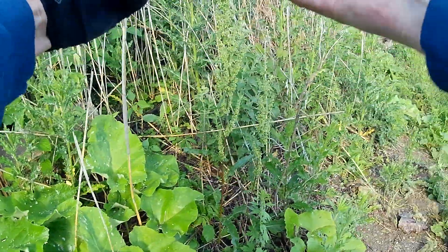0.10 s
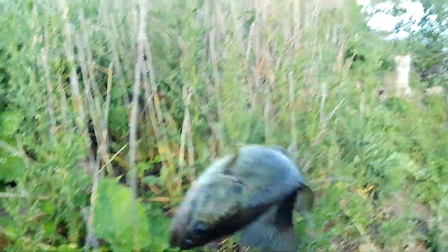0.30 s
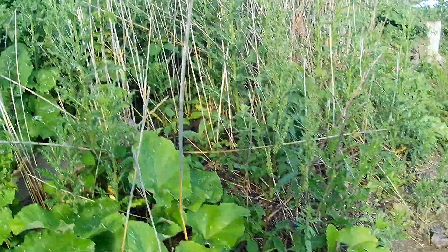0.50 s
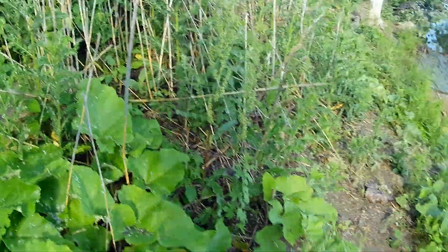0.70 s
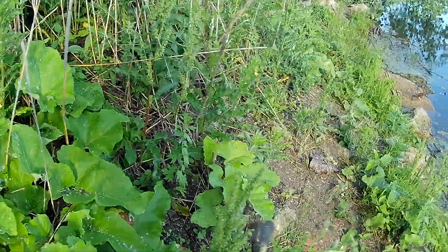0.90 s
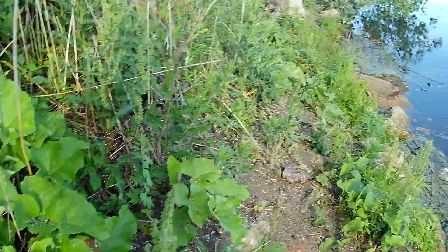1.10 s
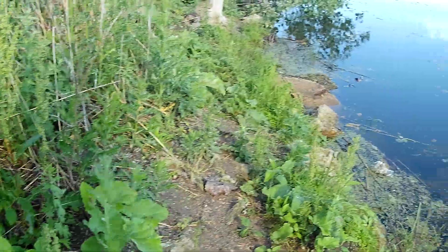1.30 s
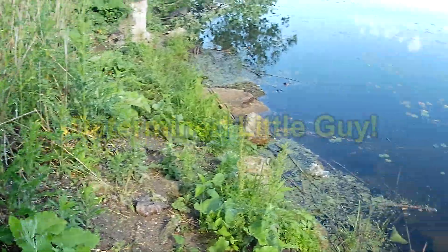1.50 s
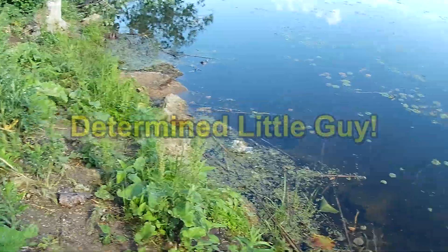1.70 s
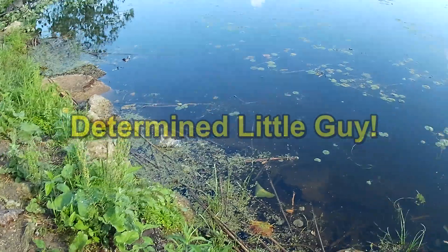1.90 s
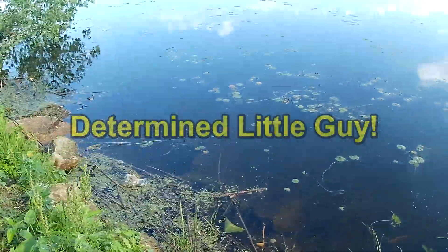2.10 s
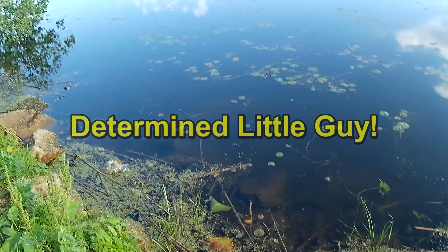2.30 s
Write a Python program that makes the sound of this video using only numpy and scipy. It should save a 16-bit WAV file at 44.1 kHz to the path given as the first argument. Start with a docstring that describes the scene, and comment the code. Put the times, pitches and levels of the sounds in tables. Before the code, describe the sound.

A small fish flops with rapid, close slaps and ticks among leafy weeds on a bank

```python
"""A small fish is let go among leafy weeds on a pond bank.
From the start: soft open air (flickering noise bands and a far-off drone), faint leaf swishes (dense
grains in swelling bands) and thin, high bird notes (blurred gliding tones), both returning to the end.
Almost at once come slaps and ticks, very close, in flurries: contacts ringing the modes of a hollow case.
Short cracks, strong or faint, ring its upper modes; a weak tail from ground and stems follows close sounds."""
import sys
import numpy as np
from scipy import signal
from scipy.io import wavfile
from scipy.ndimage import uniform_filter1d

SR = 44100
rng = np.random.default_rng(int(sys.argv[2]) if len(sys.argv) > 2 else 0)


def unload_wav(signal):
    """Save mono or channel-first audio to the path in sys.argv[1] as 16-bit WAV at rate SR, clipped to [-1, 1]."""
    wavfile.write(
        sys.argv[1],
        SR,
        np.round(np.clip(np.atleast_2d(signal).T, -1, 1) * 32767).astype(np.int16),
    )


N = 103635
TIME = np.arange(N) / SR
# upper modes of the hollow case: f/Hz, relative level/dB, t60/s
BRIGHT_MODES = [(1890, 3, 0.0037), (2540, 2.5, 0.0088), (2920, -9.5, 0.0076), (3739, 1.5, 0.012),
                (3920, 1.5, 0.0033), (4756, -7, 0.015)]


def from_db(db):
    """Decibels to gain."""
    return 10 ** (np.asarray(db) / 20)


def rms_one(x):
    """Scale to an rms of 1."""
    return x / np.sqrt(np.mean(x ** 2) + 1e-20)


def at_hz(points, hz):
    """Interpolate a table on a log-frequency axis."""
    f, value = np.transpose(points)
    return np.interp(np.log(hz), np.log(f), value)


def band(x, low_hz, high_hz, order=2):
    """Butterworth band-pass."""
    sos = signal.butter(order, [low_hz, min(high_hz, .48 * SR)], "band", fs=SR, output="sos")
    return signal.sosfilt(sos, x + 1e-18)


def drift(rate_hz):
    """Smooth noise of unit rms: white noise through a double pole, with 1 s of run-in dropped."""
    r = np.exp(-2 * np.pi * rate_hz / SR)
    return rms_one(signal.lfilter([1], [1, -2 * r, r * r], rng.standard_normal(N + SR))[SR:])


def third_octaves():
    """Bands as (low, centre, high) in Hz."""
    edges = 22 * 2 ** (np.arange(30) / 3)
    return zip(edges, np.sqrt(edges[1:] * edges[:-1]), edges[1:])


def add(out, start_s, sound):
    """Mix a sound in at a time."""
    i = max(int(start_s * SR), 0)
    out[i:i + len(sound)] += sound[:max(N - i, 0)]


def air():
    """Outdoor hush: flickering noise bands, less alike left to right in the bass, plus a wandering drone."""
    # spectrum of the hush: f/Hz, relative density/dB per Hz
    spectrum = [(25, -7), (48, -13), (64, 4.5), (120, -0.5), (200, -2), (330, -6.5), (700, -3),
                (1000, -1.5), (1500, -7.5), (2000, -9.5), (2600, -5.5), (3100, -14.5), (3800, -6.5),
                (5000, -17.5), (5900, -25.5), (8500, -30.5), (10500, -33.5)]
    # course of the hush: t/s, level/dB
    course = [(0, -62.5), (.3, -62.5), (.7, -61.5), (.9, -63), (1.15, -62), (1.33, -63.5), (1.5, -62.5),
              (1.7, -65), (1.9, -63), (2.13, -66.5), (2.35, -64)]
    # stereo correlation: f/Hz, left-right likeness/1
    likeness = [(130, 0.52), (260, 0.36), (600, 1), (8500, 0.82)]
    flicker_rms_db, flicker_rate_hz = 2.2, 9.9
    hum_hz, hum_db, hum_wander_rms_hz = 62.6, -79.5, 3.35

    hush, white = 0, rng.standard_normal((2, 2, N))
    for k, (low, hz, high) in enumerate(third_octaves()):
        mid, side = band(white[k % 2], low, high, order=3)
        alike = np.clip(at_hz(likeness, hz), -1, 1)
        gain = from_db(at_hz(spectrum, hz) + flicker_rms_db * drift(flicker_rate_hz))
        stereo = np.sqrt(1 + alike) * mid + np.sqrt(1 - alike) * side * [[1], [-1]]
        hush = hush + gain * stereo
    level_db = np.interp(TIME, *np.transpose(course))

    hum_phase = 2 * np.pi * np.cumsum(hum_hz + hum_wander_rms_hz * drift(2.0)) / SR
    hum = rms_one(np.sin(hum_phase) * (1 + 0.29 * drift(5.3)))
    return from_db(level_db) * rms_one(hush) + from_db(hum_db) * hum


def leaves():
    """Dense tiny slips of leaf on leaf, clumped and band-filtered, swell and fade with each swish."""
    # swishes: peak t/s, level/dB, rise/s, fall/s, tilt/dB per octave
    swishes = [(0.017, -54, 0.027, 0.011, -2), (0.172, -53.5, 0.0016, 0.021, -3),
               (0.543, -47.5, 0.013, 0.0067, -1.5), (0.584, -39.5, 0.012, 0.005, -1),
               (0.598, -42, 0.011, 0.018, 2), (.638, -52, 0.02, 0.037, 3), (0.745, -45, 0.012, 0.011, 1.9),
               (1.052, -53, 0.027, 0.0078, -1), (1.089, -49.5, 0.0084, 0.016, 0.5),
               (1.162, -41.5, 0.0081, 0.0061, 4), (1.225, -43, 0.008, 0.0079, 1),
               (1.462, -51, 0.01, 0.0034, 1), (1.497, -52, 0.011, .009, -3.5),
               (1.533, -48, 0.006, 0.0058, -3.5), (1.654, -55.5, 0.016, 0.0038, -4),
               (2.222, -53.5, 0.0097, 0.019, 1)]
    # shared leaf spectrum: f/Hz, relative density/dB per Hz
    spectrum = [(150, -51), (330, -11), (520, 1.5), (720, 3), (1100, 7), (1900, -8), (2500, 2), (3000, -3),
                (3900, -1), (5300, -8.5), (6400, -24), (7300, -30), (9000, -36.5), (11000, -74)]
    slips_per_s, slip_spread_db = 3500, 3.5
    clump_db, clump_rate_hz = 1, 72

    strength = from_db(slip_spread_db * np.minimum(rng.exponential(1, N), 4))
    slips = (rng.random(N) < slips_per_s / SR) * strength
    slips = slips * from_db(clump_db * np.clip(drift(clump_rate_hz), -2, 2))
    # level the power over about 8 ms
    slips = slips / np.sqrt(uniform_filter1d(slips ** 2, size=350) + 1e-9)
    grains = [rms_one(slips * rng.choice([-1, 1], N)) for _ in range(2)]

    low, hz, high = np.transpose(list(third_octaves())[8:-2])
    power = np.zeros((len(hz), N))
    for peak_s, db, rise_s, fall_s, tilt in swishes:
        colour = from_db(at_hz(spectrum, hz) + tilt * np.log2(hz / 2000)) ** 2
        share = colour / np.sum(colour * (high - low) / (SR / 2))
        near = np.abs(TIME - peak_s) < .15
        age_s = TIME[near] - peak_s
        swell = from_db(db) * np.exp(-np.maximum(-age_s / rise_s, age_s / fall_s))
        power[:, near] += np.outer(share, swell ** 2)
    return sum(np.sqrt(power[k]) * band(grains[k % 2], low[k], high[k], order=3)
               for k in range(len(hz)))


def birds():
    """Thin whistles swell, glide and linger among the trees; random modulation blurs each line."""
    # notes: start t/s, length/s, start f/Hz, end f/Hz, level/dB before the tail
    notes = [(.001, 0.17, 8430, 9000, -85.5), (.001, 0.31, 3007, 2770, -70), (.001, 0.32, 5120, 4950, -81),
             (0.347, 0.16, 7050, 7120, -73), (.45, 0.12, 5330, 5720, -74.5),
             (0.861, 0.071, 8400, 8450, -79.5), (1.182, 0.27, 8500, 6800, -88),
             (1.56, 0.09, 8280, 8400, -81.5), (1.79, 0.14, 5120, 5160, -68),
             (2.178, 0.034, 8100, 8080, -72), (2.185, 0.095, 8140, 8000, -88)]
    tail_t60_s, tail_db = 0.66, -6
    core_rate_hz, halo_rate_hz = 35, 220
    blurred_hz = 6500  # above this the halo outweighs the core

    out = np.zeros(N)
    core, halo = [rms_one(drift(rate)) + 1j * drift(rate) for rate in (core_rate_hz, halo_rate_hz)]
    keep = from_db(-60 / (tail_t60_s * SR)) ** 2
    for start_s, length_s, start_hz, end_hz, db in notes:
        blur = core / np.abs(core) + (start_hz / blurred_hz) ** 4 * halo
        progress = np.clip((TIME - start_s) / length_s, 0, 1)
        hz = start_hz + (end_hz - start_hz) * progress
        tone = rms_one(np.real(blur * np.exp(2j * np.pi * np.cumsum(hz) / SR)))
        power = np.abs(np.sin(np.pi * progress))
        power = power + from_db(tail_db) ** 2 * signal.lfilter([1 - keep], [1, -keep], power)
        out += from_db(db) * np.sqrt(power) * tone
    return out


def ring(modes, t):
    """Damped modes, each with a new strength, sign and slight detuning."""
    spread_db, detune = 2, 0.025  # rms
    return sum(from_db(db + spread_db * rng.normal() - 60 * t / t60) * rng.choice([-1, 1])
               * np.sin(2 * np.pi * hz * (1 + detune * rng.normal()) * t) for hz, db, t60 in modes)


def contact(t, count=4):
    """One firm touch as an impulse, with a few weaker catches right after it."""
    chatter_s, chatter_share = .0031, 0.4  # latest catch, greatest strength
    force = np.zeros(len(t))
    force[0] = 1
    catches = (rng.uniform(.1, 1, count) * chatter_s * SR).astype(int)
    force[catches] += chatter_share * rng.uniform(-1, 1, count)
    return force


def struck(force, response, db):
    """A response driven by a contact, its energy set as a level over 5 ms."""
    sound = signal.fftconvolve(force, response)[:len(force)]
    return from_db(db) * sound / np.sqrt(np.sum(sound ** 2) / (.005 * SR))


def taps():
    """Each contact rings the hollow body; harder ones add bright modes and favour the highest of them."""
    # slaps and ticks: t/s, level/dB before trims, ring centre f/Hz, brightness as treble over mids/dB
    contacts = [(0.0125, -44, 930, -23), (0.1641, -43.5, 990, -12), (0.2371, -35, 900, -17.5),
                (0.2649, -24.5, 1030, -5), (0.278, -39, 1510, -15), (0.2897, -48, 1410, -12),
                (0.3112, -27, 1320, 3), (0.3133, -27.5, 1160, -1.5), (0.3421, -27, 1230, -20),
                (0.3476, -33, 1200, 0), (0.3545, -31, 1460, 1), (0.3695, -35, 1500, -2),
                (0.3754, -30.5, 1600, 1), (0.3805, -29, 1490, -4), (0.3873, -34, 1420, 0),
                (0.3915, -27, 1600, -2.5), (0.3964, -31.5, 1520, -1), (0.4071, -39.5, 1396, -3.5),
                (0.4273, -39.5, 1540, -4.5), (0.433, -44.5, 1420, -14), (0.4393, -45.5, 1490, -6),
                (0.5408, -39, 1330, 10), (0.5555, -40.5, 1470, 7), (0.568, -40.5, 1580, -8),
                (0.583, -37.5, 1310, 3), (0.5967, -48, 1210, -8), (0.645, -33, 1540, -13.5),
                (0.6506, -33, 1340, -11), (0.66, -37, 1330, -13.5), (0.6642, -38.5, 1010, -10),
                (0.7419, -41.5, 1120, 2), (0.7946, -42, 1670, -1), (0.7994, -35.5, 1380, 4.5),
                (0.8023, -39.5, 1550, -25), (0.81, -40, 1500, -3), (0.8206, -48, 1550, 1),
                (0.834, -53, 1500, -5), (0.847, -51.5, 1500, -11), (0.94, -39.5, 1260, -6),
                (0.9496, -44.5, 1220, -8), (0.9963, -45, 1200, -12), (1.008, -44, 1500, -4),
                (1.0146, -45, 1570, -5), (1.0395, -32, 1370, -9), (1.0493, -35.5, 1660, -1),
                (1.0577, -37.5, 1410, 0), (1.0674, -44.5, 1500, -5.5), (1.1423, -42, 1100, 7.5),
                (1.1595, -34.5, 1390, 11), (1.1722, -36.5, 1420, -12), (1.2187, -46, 1080, 14),
                (1.2269, -47.5, 1470, 14), (1.2882, -42, 1360, 4.5), (1.307, -45.5, 1120, -10.5),
                (1.458, -46.5, 1250, -1), (1.4917, -44, 1130, 2), (1.521, -52, 1560, 6),
                (1.6129, -50.5, 1510, -1), (1.7326, -33.5, 1340, -4), (1.741, -40.5, 1310, -10),
                (1.7776, -50, 1430, -5), (1.8283, -42.5, 1470, 1), (1.8531, -45.5, 1370, -23),
                (1.8578, -38.5, 1590, 1), (1.8651, -46.5, 1317, -3), (1.871, -55, 1490, 7),
                (1.887, -46, 1530, -6.5), (1.92, -53, 1020, -5), (1.9431, -44.5, 1420, -2.5),
                (1.9503, -38, 1336, -10), (1.9982, -55.5, 1530, -8), (2.048, -47.5, 1210, -12),
                (2.0692, -35.5, 1260, 0.5), (2.0803, -41, 1320, -3), (2.2427, -43.5, 1360, 0)]
    # hollow body: f/Hz, relative level/dB, t60/s
    body_modes = [(959, 1, 0.021), (1086, 1.5, 0.015), (1483, -1, 0.018), (1644, 1.5, 0.004)]
    # soft weight under each contact: f/Hz, level relative to the mids/dB, t60/s
    thud_modes = [(663, -27, 0.013)]
    body_trim_db, bright_trim_db = -1.8, -0.73
    focus_db_per_oct2 = 39.5  # favours body modes near the ring centre
    hardness_tilt = 0.64  # dB per octave for each dB of brightness
    body_low_hz, body_top_hz, bright_low_hz, bright_top_hz = 846, 2570, 1494, 4440

    out, t = np.zeros(N), np.arange(SR // 25) / SR
    for start_s, db, centre_hz, bright_db in contacts:
        force = contact(t)
        mids_db = db - 10 * np.log10(1 + from_db(bright_db) ** 2)
        body = [(hz, mode_db - focus_db_per_oct2 * np.log2(hz / centre_hz) ** 2, t60)
                for hz, mode_db, t60 in body_modes]
        bright = [(hz, mode_db + hardness_tilt * bright_db * np.log2(hz / bright_low_hz), t60)
                  for hz, mode_db, t60 in BRIGHT_MODES]
        thud = signal.fftconvolve(force, ring(thud_modes, t))[:len(t)]
        body_ring = band(ring(body, t), body_low_hz, body_top_hz, order=5)
        bright_ring = band(ring(bright, t), bright_low_hz, bright_top_hz, order=7)
        add(out, start_s, from_db(mids_db) * thud)
        add(out, start_s, struck(force, body_ring, mids_db + body_trim_db))
        add(out, start_s, struck(force, bright_ring, mids_db + bright_db + bright_trim_db))
    return out


def cracks():
    """Short cracks, strong and faint: upper modes band-passed around each crack's centre."""
    # cracks: t/s, level over 5 ms/dB, centre f/Hz
    snaps = [(0.1695, -65, 6200), (0.2651, -28.5, 1857), (0.2652, -31, 3810), (0.2654, -44.5, 7340),
             (0.3116, -47.5, 7900), (0.3428, -35, 1830), (0.3481, -40.5, 5030), (0.3554, -44, 3900),
             (0.3917, -33.5, 2580), (0.5975, -44.5, 5000), (0.7422, -58, 4770), (0.9398, -65, 6550),
             (1.0495, -62, 6660), (1.1592, -35, 3800), (1.162, -50.5, 6500), (1.4595, -55.5, 4700),
             (1.4916, -55.5, 5500), (2.2215, -53, 2750)]
    # highest modes: f/Hz, relative level/dB, t60/s
    crack_modes = [(5070, -7, 0.0071), (5900, -23, 0.0029), (7270, -12, 0.0068), (7900, -19, 0.0044),
                   (8950, -18, 0.006)]
    width, top_hz = 1.323, 9340  # band edges: centre / width to centre * width, capped

    out, t = np.zeros(N), np.arange(SR // 25) / SR
    for start_s, db, centre_hz in snaps:
        upper = ring(BRIGHT_MODES + crack_modes, t)
        response = band(upper, centre_hz / width, min(centre_hz * width, top_hz), order=6)
        add(out, start_s, struck(contact(t), response, db))
    return out


def scattered(x):
    """Sound thrown back by ground and stems: a weak decaying noise tail after a 4 ms gap."""
    scatter_db, t60_s = -20.5, 0.19
    t = np.arange(SR // 5) / SR
    tail = rng.standard_normal(len(t)) * from_db(-60 * t / t60_s) * (t > .004)
    return from_db(scatter_db) * signal.fftconvolve(x, tail / np.linalg.norm(tail))[:N]


def scene():
    """Close sounds and birds sit in the middle of the open air."""
    close = leaves() + taps() + cracks()
    return air() + birds() + close + scattered(close)


def record(dry):
    """Each microphone adds a steady hiss; a steep elliptic low-pass cuts the top."""
    hiss_db, cutoff_hz = -92, 15750  # hiss rms before the cut
    hiss = from_db(hiss_db) * rng.standard_normal((2, N))
    top_cut = signal.ellip(10, .1, 70, cutoff_hz, fs=SR, output="sos")
    return signal.sosfilt(top_cut, dry + hiss)


dry = scene()
out = record(dry)
unload_wav(out)
```